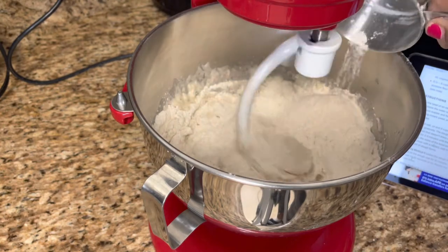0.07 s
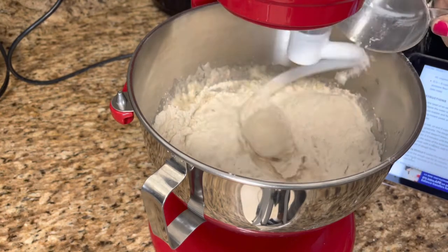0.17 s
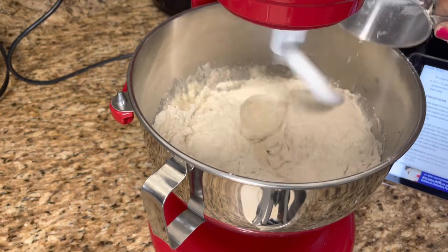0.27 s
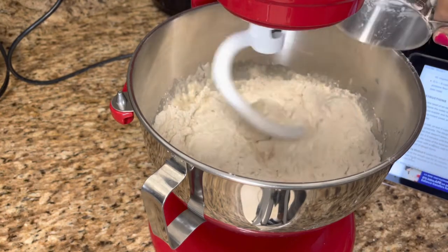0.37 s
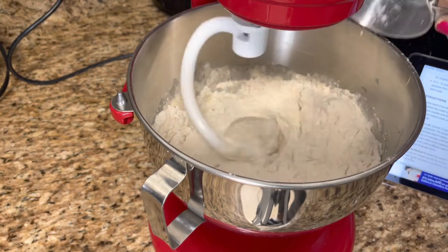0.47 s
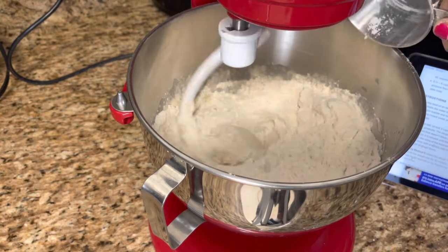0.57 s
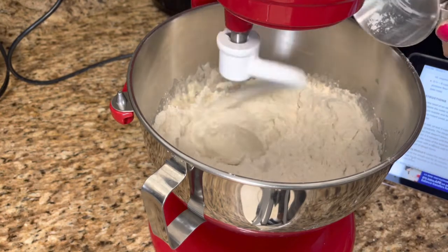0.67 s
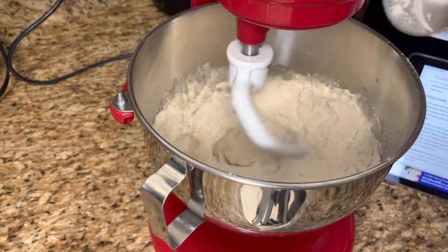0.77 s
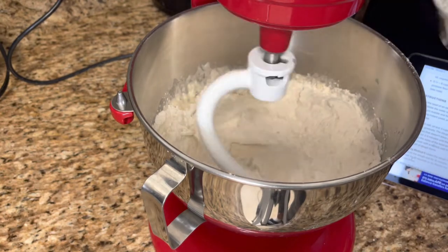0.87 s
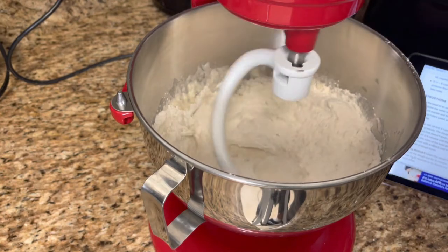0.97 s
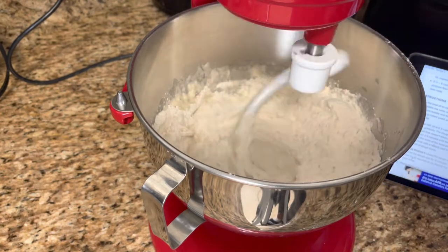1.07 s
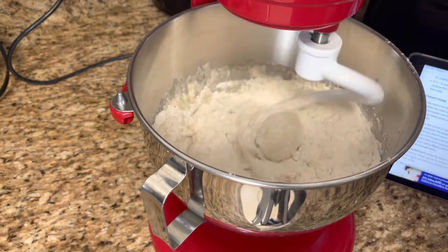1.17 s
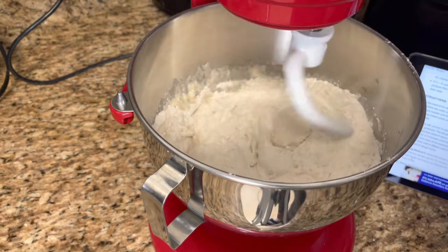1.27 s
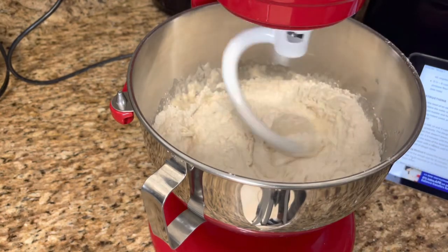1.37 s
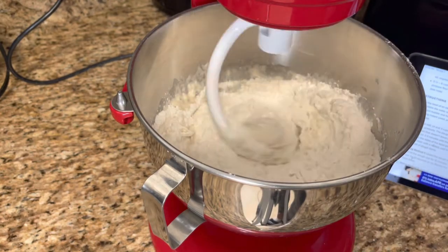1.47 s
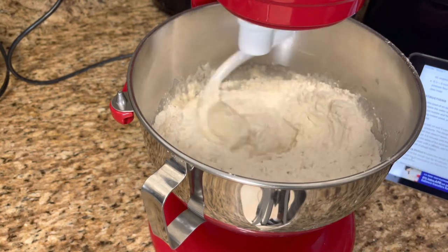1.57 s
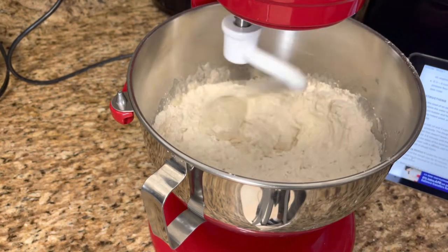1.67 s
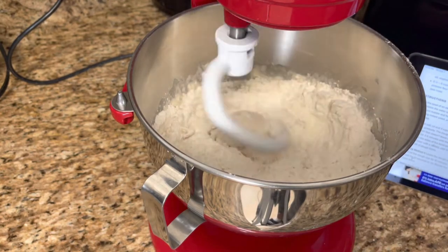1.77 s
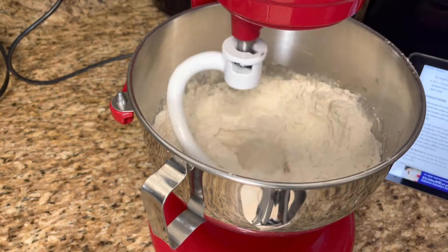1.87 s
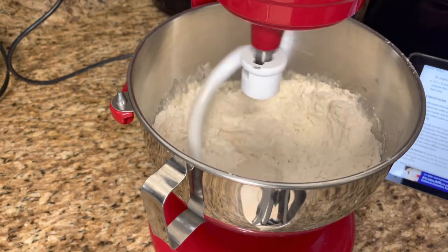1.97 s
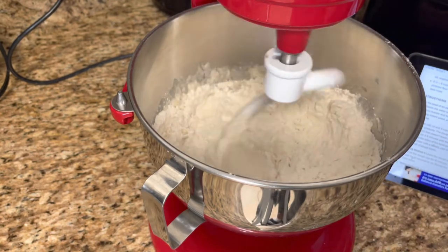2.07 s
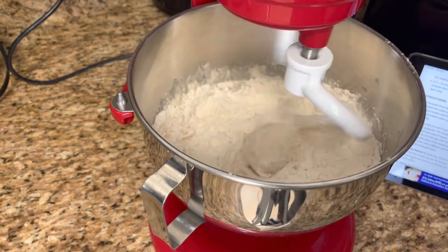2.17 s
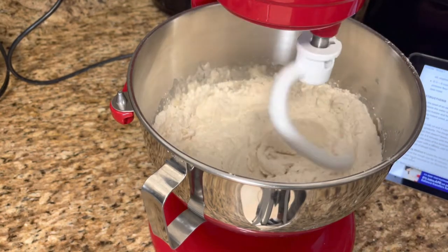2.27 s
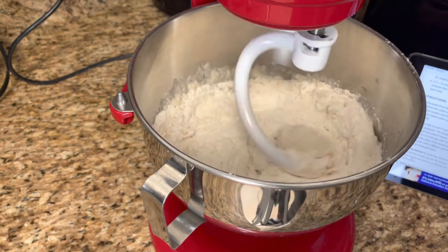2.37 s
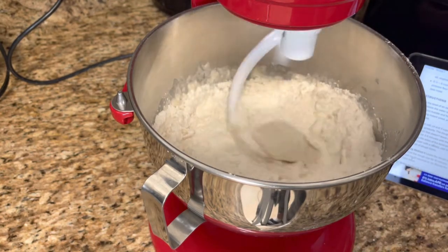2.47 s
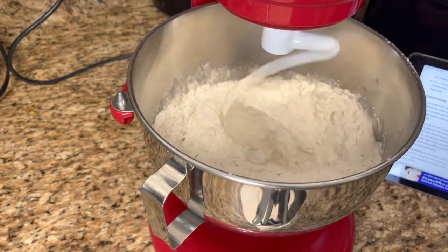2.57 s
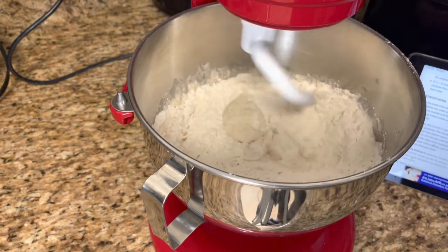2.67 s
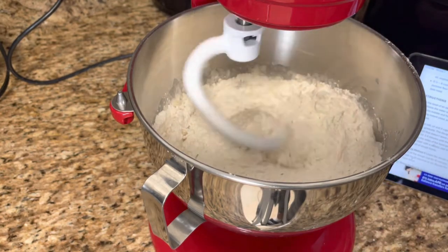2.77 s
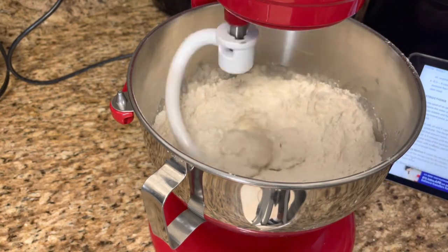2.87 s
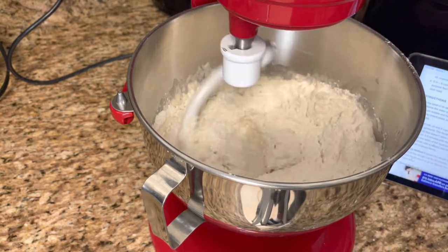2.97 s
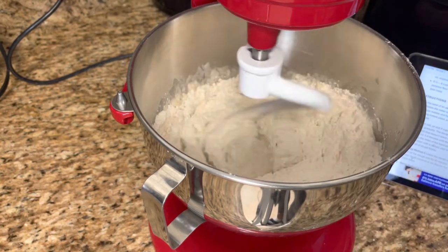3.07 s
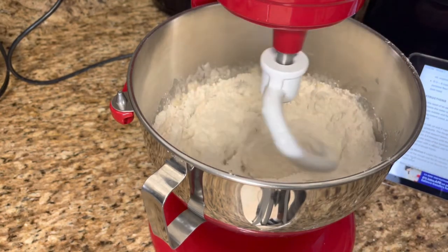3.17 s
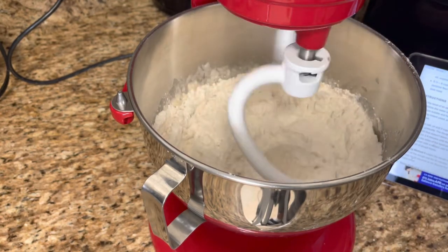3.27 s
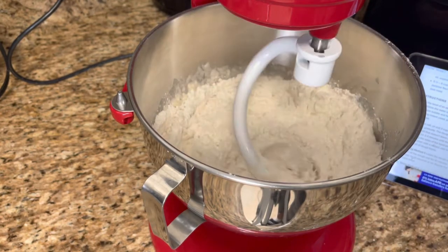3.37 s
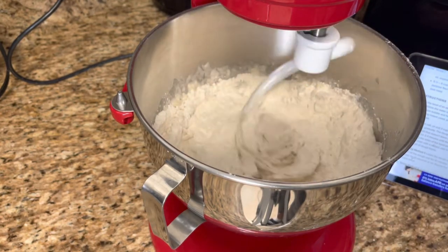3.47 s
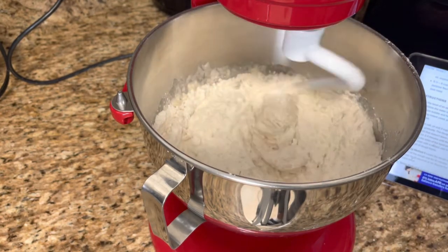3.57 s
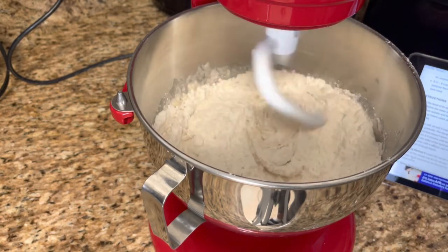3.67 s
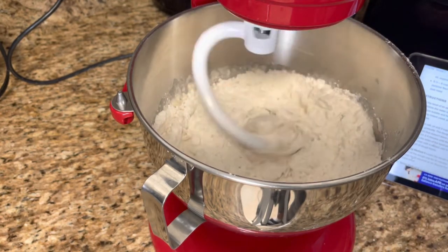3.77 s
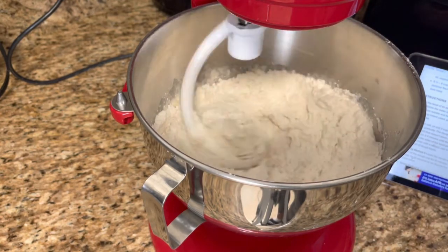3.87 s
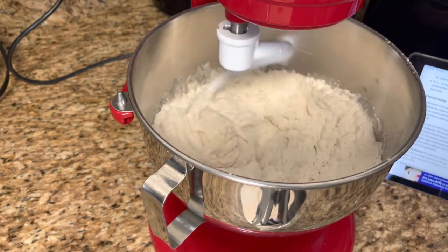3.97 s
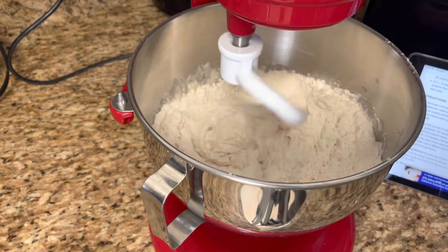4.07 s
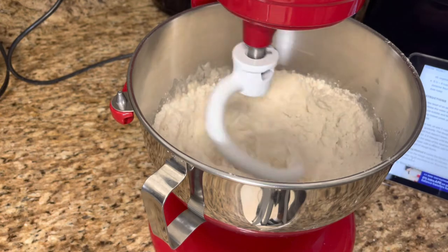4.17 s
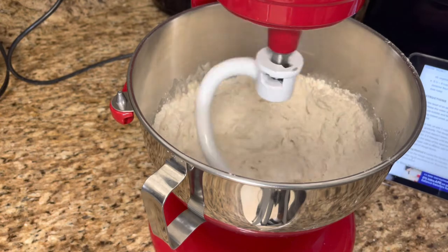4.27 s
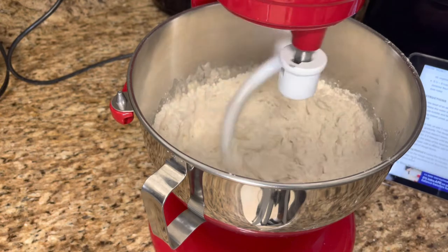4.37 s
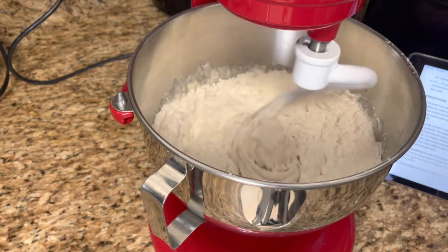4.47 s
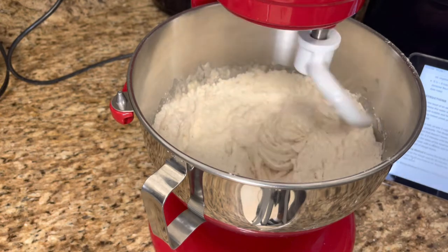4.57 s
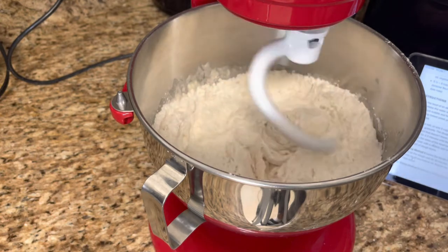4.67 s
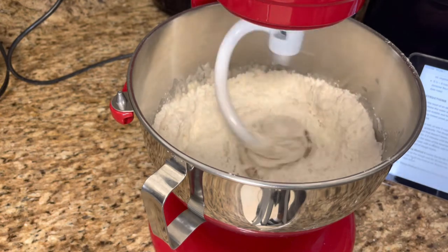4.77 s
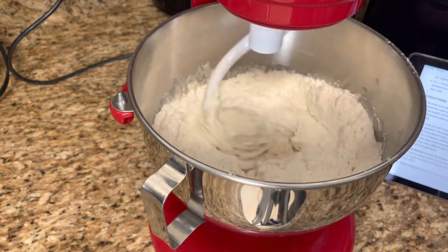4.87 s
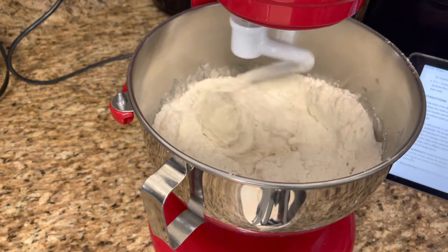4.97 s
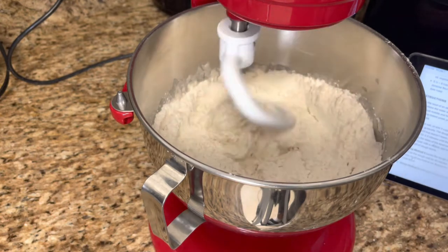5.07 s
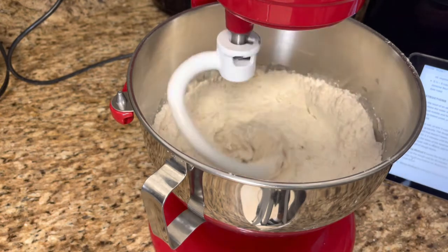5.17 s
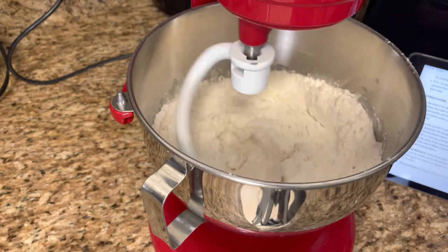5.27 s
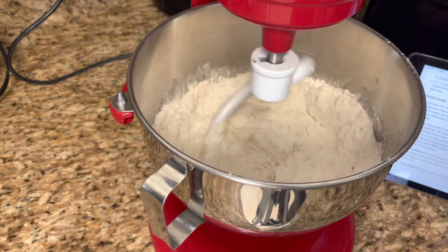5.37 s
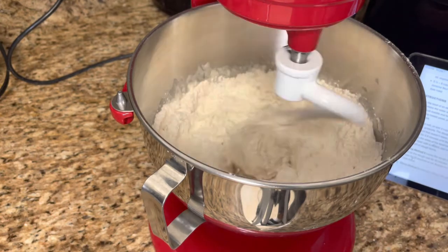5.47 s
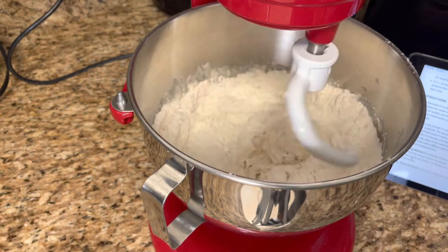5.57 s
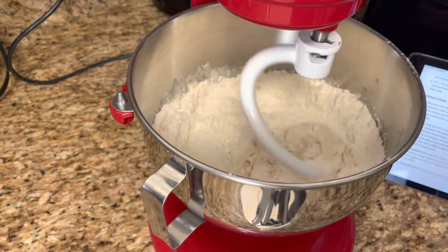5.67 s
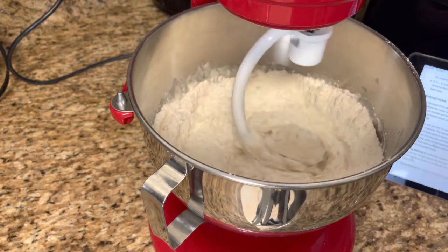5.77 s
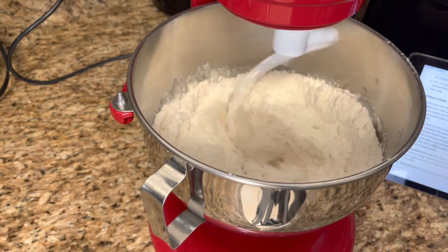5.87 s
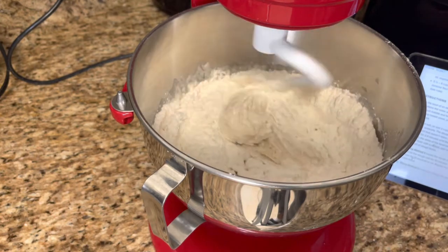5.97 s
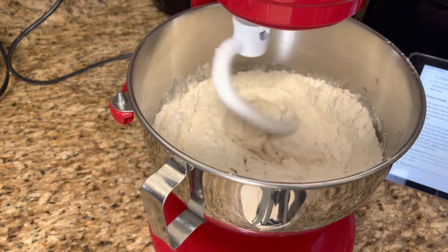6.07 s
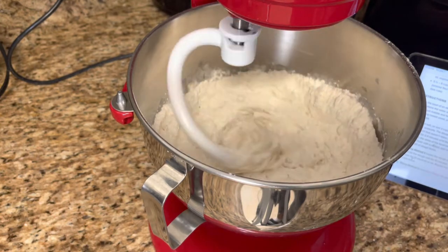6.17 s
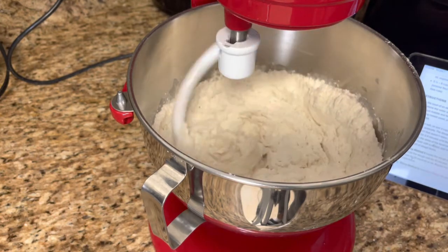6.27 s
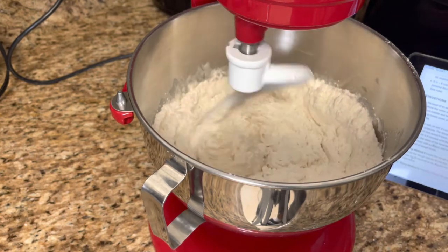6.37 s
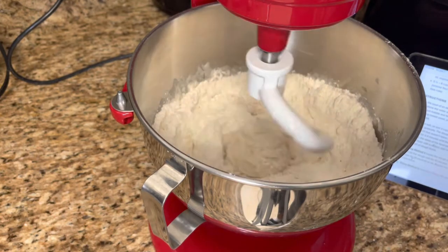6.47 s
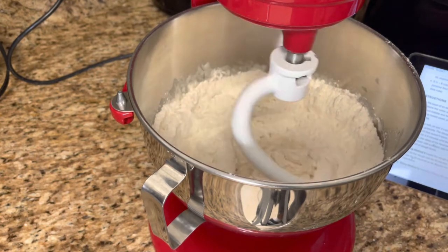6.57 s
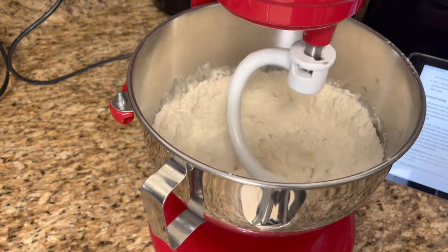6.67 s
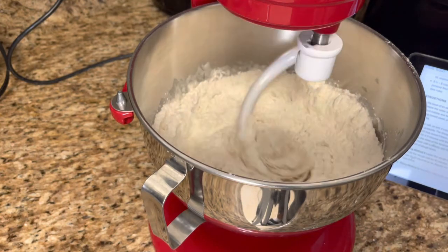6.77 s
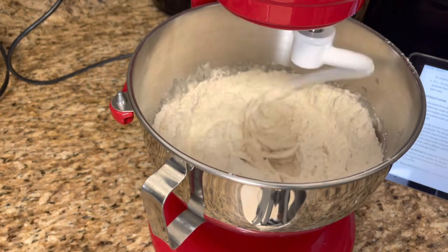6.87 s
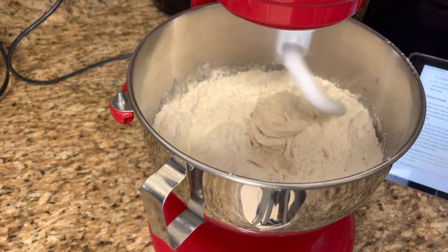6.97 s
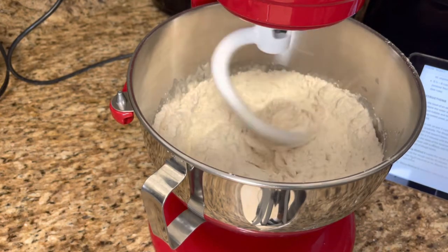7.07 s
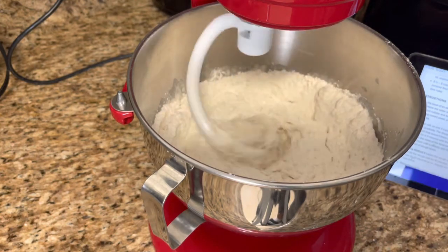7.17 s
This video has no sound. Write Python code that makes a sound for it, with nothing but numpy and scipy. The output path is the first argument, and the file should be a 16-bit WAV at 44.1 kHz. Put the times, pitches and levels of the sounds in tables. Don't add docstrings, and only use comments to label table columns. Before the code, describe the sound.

A stand mixer runs throughout, very close, its gear whine surging about three times a second over electrical hum and airy fan hiss. Right at the start a steel cup knocks twice on the bowl rim, loud and ringing briefly. Later a few soft, dull bumps come from the hook in stiff dough. Small kitchen, handheld phone pickup in stereo.

```python
import sys
import numpy as np
from scipy import signal
from scipy.fft import rfft, irfft, next_fast_len
from scipy.io import wavfile
from scipy.ndimage import uniform_filter1d, map_coordinates

SR = 44100
rng = np.random.default_rng(int(sys.argv[2]) if len(sys.argv) > 2 else 0)


def digitize_waveform(pressure):
    field = np.atleast_2d(pressure).T
    bounded = np.clip(field, -1, 1)
    quanta = np.round(bounded * 32767).astype(np.int16)
    wavfile.write(sys.argv[1], SR, quanta)


def ratio_of_db(decibels):
    return 10 ** (np.asarray(decibels, float) / 20)


N = 318472
TEETH = 31
SIDES = np.array([[1], [-1]])


def along(points, hz):
    f, *cols = np.transpose(points)
    return [np.interp(np.log(hz + 1), np.log(f + 1), c) for c in cols]


def wobble(rate):
    coarse = np.arange(0, N + 32, 32)
    knots = rng.standard_normal(int(N * rate / SR) + 4)
    return np.interp(np.arange(N), coarse, map_coordinates(knots, [coarse * rate / SR]))


def every_turn(turns, count):
    return map_coordinates(rng.standard_normal(count), [turns % 1 * count], mode="grid-wrap")


def filtered(x, response):
    m = next_fast_len(N + SR // 2)
    return irfft(rfft(x, m) * response(np.fft.rfftfreq(m, 1 / SR)), m)[..., :N]


def peak(f, hz, width):
    return (1j * f * width / (hz * hz - f * f + 1j * f * width)) ** 2


def ports(balance_db, lead):
    return ratio_of_db(SIDES * balance_db / 2) * np.exp(-0.5j * SIDES * lead)


def tone(cycles, level_db, rough, balance_db, lead):
    phase = 2 * np.pi * cycles + rough * wobble(14) + rng.uniform(0, 2 * np.pi)
    return np.sqrt(2) * ratio_of_db(level_db) * np.real(ports(balance_db, lead) * np.exp(1j * phase))


def diffuse(x, spectrum):
    # frequency in Hz, likeness of the ports 0-1, left-right balance in dB, right lead in rad.
    port_field = [(60, .98, 1, 0), (150, .93, 3, -.1), (350, .8, 2, -.3), (700, .2, 3, 0),
                  (3500, .2, 2, -1.5), (5600, .2, 7, 0), (8000, .6, 1, 0), (9000, .9, 0, .7),
                  (9500, .92, 0, 2.1), (9750, 1, 0, 3.1), (10350, 1, 0, 3.15), (10700, .93, 0, 3.5),
                  (11050, .4, 0, 4.7), (11300, .88, 0, 6.2), (11600, 1, 0, 6.28)]
    m = next_fast_len(N + SR // 2)
    hz = np.fft.rfftfreq(m, 1 / SR)
    alike, balance_db, lead = along(port_field, hz)
    turn = np.arccos(np.clip(alike, 0, 1)) / 2
    colour = ratio_of_db(along(spectrum, hz)[0])
    common, apart = rfft(x, m) * colour * [np.cos(turn), np.sin(turn)]
    return irfft((common + SIDES * apart) * ports(balance_db, lead), m)[:, :N]


def echoes(hz, depth_db, spacing):
    ripple = [map_coordinates(knots, [hz / spacing]) for knots in rng.standard_normal((2, 400))]
    return ratio_of_db(depth_db * np.array(ripple) * ((hz > 700) & (hz < 8000)))


def fan_and_brushes(shaft):
    # frequency in Hz, level in dB per Hz.
    hiss = [(38, -100), (52, -68), (85, -71.5), (190, -80.5), (1160, -76.5), (1800, -73.5), (2700, -78),
            (3900, -76.5), (5500, -71), (8400, -72.5), (9700, -67), (10500, -72), (11300, -74.5),
            (12150, -81.5), (12400, -120)]
    # frequency in Hz, width in Hz, level over the hiss in dB.
    vents = [(1184, 76, -8.5), (8160, 43, -14), (8750, 29, 10), (9020, 74, 8.5), (9720, 75, 8.5),
             (9500, 100, 6), (10000, 56, 6), (10340, 70, 5), (10420, 45, 16), (10700, 45, 5),
             (10784, 26, 18.5), (10820, 27, 7.5), (11400, 100, 5), (11600, 110, -4)]
    flutter = ratio_of_db(0.7 * wobble(7) + 0.23 * np.sin(2 * np.pi * shaft))
    air = diffuse(flutter * rng.standard_normal((2, N)), hiss)

    def slots(f):
        return 1 + sum((ratio_of_db(db) - 1) * np.abs(peak(f, hz, width)) for hz, width, db in vents)

    return np.sqrt(SR / 2) * filtered(air, lambda f: slots(f) * echoes(f, depth_db=2.5, spacing=50))


def magnetic_hum():
    # multiple of twice the mains, level in dB, left-right balance in dB.
    hum = [(1, -58, 2), (2, -61.5, 6), (3, -64, 4), (4, -57, -5), (5, -47.5, 8)]
    mains_hz = 60
    t = np.arange(N) / SR
    total = 0
    for k, db, side_db in hum:
        level_db = db + 0.6 * k * wobble(5) + wobble(2)
        total = total + tone(2 * mains_hz * k * t, level_db, rough=0.5, balance_db=side_db, lead=0.08 * k * k)
    return total


def shaft_orders(shaft):
    # multiple of shaft speed, level in dB.
    orders = [(6.29, -62.5), (7.62, -60), (7.95, -55), (8.92, -50.5), (12, -61), (20, -55.5), (24, -54.5),
              (40, -60)]
    return sum(tone(k * shaft, db + 2.5 * wobble(6), rough=0.9, balance_db=0, lead=0.1) for k, db in orders)


def hook():
    # start in seconds, peak level in dB.
    bumps = [
        (2.338, -23),
        (2.669, -27.5),
        (3.37, -26.5),
        (4.728, -29),
    ]
    # frequency in Hz, level in dB.
    thud = [(60, -34), (400, -23), (900, -8), (1800, -17), (2600, -19), (6000, -50), (9000, -90)]
    burst, t = np.zeros((2, N)), np.arange(SR // 4) / SR
    for s, db in bumps:
        swell = ratio_of_db(db + 22.5 - 60 * t / 0.17) * (1 - np.exp(-t / 0.015))
        burst[:, round(s * SR):][:, :len(t)] += swell * rng.standard_normal((2, len(t)))
    return diffuse(burst, thud)


def cup():
    knocks = [
        (.106, -22, 0.044),
        (0.1073, -9, 0),
        (.110, -12.5, 0),
        (.117, -15, 0),
        (.123, -15, 0),
        (0.343, -12, 1),
        (0.346, -25, 1),
        (0.347, -15, 1),
        (.357, -15, 1),
    ]
    # frequency in Hz, level in dB, t60 in seconds, left-right balance in dB.
    flat_modes = [(380, -13, .05, 0), (533, -8, .08, 3), (775, -7, .06, -3), (1230, -4, .04, 0),
                  (1443, -22, .25, -3), (1550, -7, .06, 1), (2153, -15, .06, 1), (2250, -35, 1.2, 0),
                  (2602, -13, .28, 5), (2960, -8, .05, 4), (3575, -19, .15, 2), (3854, -18.5, .3, 7),
                  (5599, -26, .3, 0)]
    # frequency in Hz, level in dB, t60 in seconds, left-right balance in dB.
    edge_modes = [(170, -15, .07, 2), (800, -13, .06, 0), (1030, -12, .08, 4), (2250, -31, 1.2, 0),
                  (2870, -1, .022, 6), (4300, -12, .1, 6), (4748, -13, .15, 10), (5070, -11, .1, 6),
                  (6724, -13, .1, 1), (7612, -15, .18, 2), (8830, -8, .03, 0), (11370, -12, .03, 0),
                  (12350, -20, .06, 0), (13900, -16, .06, 0)]
    # frequency in Hz, level in dB.
    cracks = [
        [(60, -40), (300, -8), (1000, 0), (3000, -2), (6000, -14), (13000, -30)],
        [(60, -40), (250, -5), (1000, -6), (2000, -14), (4500, -6), (8000, -9), (10300, 4), (11500, -12),
         (14500, -20)],
    ]
    ring, burst, t = np.zeros((2, N)), np.zeros((2, 2, N)), np.arange(SR // 2) / SR
    tail = ratio_of_db(-60 * t / 0.025) + ratio_of_db(-7 - 60 * t / 0.18)
    for s, db, edge in knocks:
        hz, level_db, t60, side_db = np.transpose(edge_modes if edge else flat_modes)[:, :, None]
        chance = rng.standard_normal((2, len(hz), 1))
        modes = np.exp((2j * np.pi * hz - np.log(1000) / t60) * t)
        heard = ratio_of_db(db + level_db + chance[0]).T * ports(side_db.T, 1.3 * chance[1].T)
        onset = 1 - np.exp(-t / 0.00014)
        start = round(s * SR)
        ring[:, start:][:, :len(t)] += np.imag(heard @ modes) * onset
        crack = ratio_of_db(db + (2 if edge else -3)) * tail * rng.standard_normal((2, len(t)))
        burst[int(edge), :, start:][:, :len(t)] += crack
    return ring + diffuse(burst[0], cracks[0]) + diffuse(burst[1], cracks[1])


def governor():
    # centre in seconds, half length in seconds, effort in dB, overspeed as mesh Hz, strain in dB.
    surges = [(0.024, 0.1697, 10.5, 22.7, 4), (0.386, 0.1395, 7, 7.94, -1.5), (0.782, .11, 8.5, 14.6, 0),
              (1.172, .22, 8.5, 12.9, 0.5), (1.495, .13, 6, 17.1, -0.5), (1.65, .19, 6.5, 15.1, 0),
              (2.128, .12, 9.5, 27, -1.5), (2.41, .16, 8, 16, 0), (2.78, .19, 10.5, 26, -2.5),
              (3.111, .11, 5.7, 18, -0.5), (3.4, .16, 8, 24, 3.5), (3.75, .11, 6.5, 10, -2.5),
              (4.13, .11, 9, 24, 0.5), (4.43, 0.15, 7, 18, 1.5), (4.75, 0.1405, 9.7, 23, -1.5),
              (5.12, .13, 7.5, 8.9, 0.5), (5.41, .14, 8.6, 13, -0.5), (5.77, 0.15, 9, 19, -1.5),
              (6.12, .13, 9, 23, 0), (6.44, .14, 8.1, 14.6, 0.5), (6.83, .18, 9, 20.2, 1),
              (7.13, .12, 7, 14, 0)]
    s, half, *lifts = np.transpose(surges)
    coarse = np.arange(0, N + 64, 64) / SR
    bells = np.exp(-((coarse[:, None] - s) / half) ** 2)
    effort_db, over_hz, strain_db = [np.interp(np.arange(N) / SR, coarse, bells @ lift) for lift in lifts]
    mesh_hz = 1597.5 + over_hz
    whine_db = -45 + effort_db
    groan_db = 0.4 * effort_db + 0.23 * over_hz + strain_db
    return mesh_hz, whine_db, groan_db


def gears(shaft, whine_db, groan_db):
    # frequency in Hz, width in Hz, level in dB per Hz,
    # left-right balance in dB, right lead in rad.
    gearcase = [(400, 40, -65, 0, 0.2), (430, 30, -66, 0, 0), (460, 30, -62, -3, 0.0),
                (534, 19, -54, 8, -1.05), (624, 40, -59, 4, -1.2), (790, 50, -71, -5, 0.7),
                (915, 40, -70, 2, -0.5), (1029, 36, -61.5, 4, 1.9), (1254, 26, -69.5, -3, 0.2),
                (1610, 60, -62, 5, -0.4), (1770, 40, -69, 0, -0.5), (1900, 30, -69, -5, -2),
                (2070, 36, -66, -3, 2.4), (2230, 25, -71, 1, 0.9)]
    head = [(2530, 40, -74, 5, 2.9), (2810, 100, -79, 2, 2.1), (3130, 60, -73, 0, -0.9),
            (3750, 40, -73, 1, -0.3), (4360, 50, -66, 4, -2.2), (4710, 70, -68, 9, 1.0),
            (5010, 40, -62, 2, 0.9), (5320, 100, -66, 9, 0.8), (5610, 50, -64, 9, 0.6)]
    cover = [(5950, 90, -65, 8, 2.5), (6260, 84, -62, 11, -0.7), (6490, 30, -66, 1, 0.4),
             (6730, 40, -65, 3, 0.1), (7380, 46, -67, 2, -0.5), (7530, 50, -66, 3, -2),
             (7900, 170, -67, 0, -0.7)]
    # times a turn of the big gear, depth in dB.
    beats = [(1, 0.9), (2, 2), (3, 1.36), (4, 1.4), (6, 1.4)]
    gear = shaft / 6
    beat_db = sum(db * np.sin(2 * np.pi * (k * gear + rng.random())) for k, db in beats)
    whine = tone(TEETH * shaft, 1.218 * whine_db + 8.5 + beat_db, rough=1.08, balance_db=5.0, lead=-0.57)

    flaws = 0.89 * every_turn(gear, count=5100) + 0.68 * rng.standard_normal(N)
    flaws = flaws + 0.5 * rng.standard_normal((2, N))
    flaws = flaws * ratio_of_db(2 * every_turn(gear, count=10))

    load_db = groan_db - np.median(groan_db)
    groan = ratio_of_db(0.8 * load_db) * filtered(flaws, lambda hz: hz < 575)
    rattle = ratio_of_db(0.2 * load_db) * filtered(flaws, lambda hz: (hz >= 575) & (hz < 3000))
    fizz_db = 0.41 * every_turn(gear, count=16) + 0.69 * wobble(8)
    fizz = filtered(rng.standard_normal(N) * ratio_of_db(fizz_db), lambda hz: hz >= 3000)

    def body(f):
        return sum(ratio_of_db(db) * ports(side_db, lead) * peak(f, hz, 0.99 * width)
                   for hz, width, db, side_db, lead in gearcase + head + cover)

    return whine + ratio_of_db(0.5) * np.sqrt(SR / 2) * filtered(groan + rattle + fizz, body)


def scene():
    mesh_hz, whine_db, groan_db = governor()
    shaft = np.cumsum(mesh_hz) / TEETH / SR
    motor = fan_and_brushes(shaft) + magnetic_hum() + shaft_orders(shaft)
    return motor + hook() + cup() + gears(shaft, whine_db, groan_db)


def gain_control():
    # time of the blow in seconds, depth in dB.
    ducks = [
        (.106, 0),
        (.343, 1.5),
    ]
    deepest_s = 0.11
    since = [np.maximum(np.arange(N) / SR - s, 0) / deepest_s for s, db in ducks]
    return ratio_of_db(-sum(db * u * np.exp(1 - u) for u, (s, db) in zip(since, ducks)))


def drop_weak_patches(x):
    # from Hz, to Hz, share dropped 0-1, how far the threshold follows loudness 0-1.
    thinned = [(2300, 4200, .05, 0), (10300, 20000, .4, .7)]
    hz, t, z = signal.stft(x.mean(0), SR, nperseg=1024)
    patch = uniform_filter1d(uniform_filter1d(np.abs(z) ** 2, size=6, axis=0), size=3, axis=1)
    weak = np.zeros(z.shape, bool)
    for from_hz, to_hz, share, follow in thinned:
        band = (hz > from_hz) & (hz < to_hz)
        level = patch[band] / uniform_filter1d(patch[band].mean(0), size=9) ** follow
        weak[band] = level < np.quantile(level, share, axis=1)[:, None]
    return x - signal.istft(z * weak, SR, nperseg=1024)[1][:N]


def low_pass(x):
    return signal.sosfilt(signal.butter(12, 12770, fs=SR, output="sos"), x)


def record(dry):
    x = filtered(dry, lambda hz: (1j * hz / (40 + 1j * hz)) ** 2) * gain_control()
    x = x / (1 + np.abs(x / 1.3) ** 4) ** (1 / 4)
    x = drop_weak_patches(x)
    return low_pass(x)


dry = scene()
out = record(dry)
digitize_waveform(out)
```